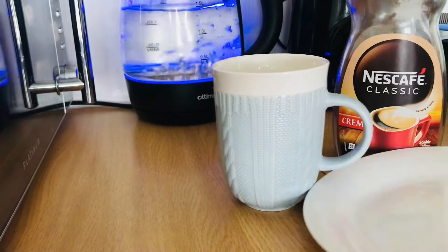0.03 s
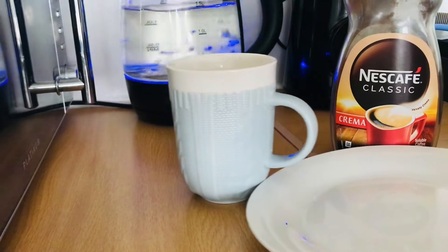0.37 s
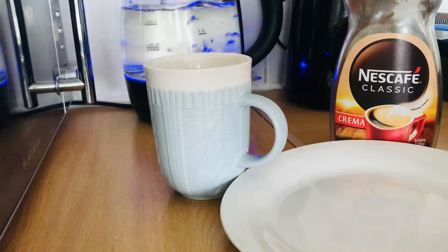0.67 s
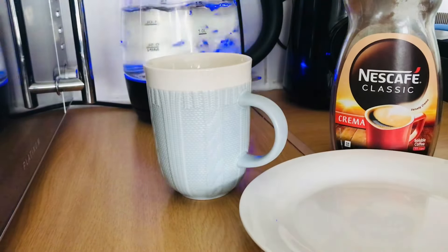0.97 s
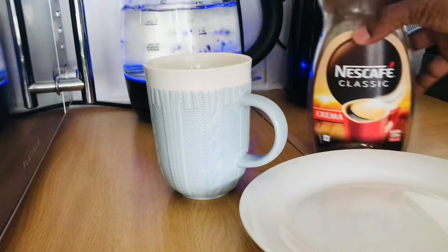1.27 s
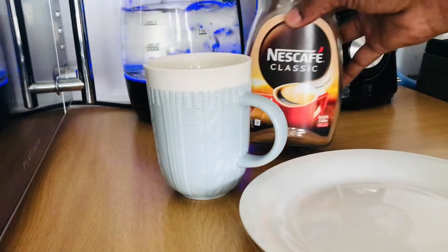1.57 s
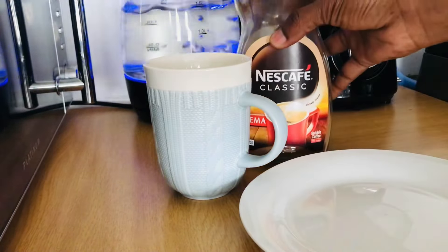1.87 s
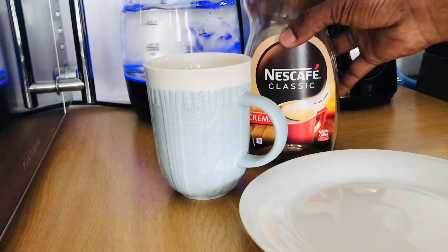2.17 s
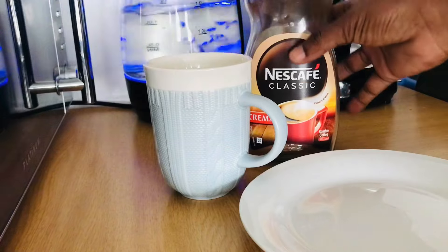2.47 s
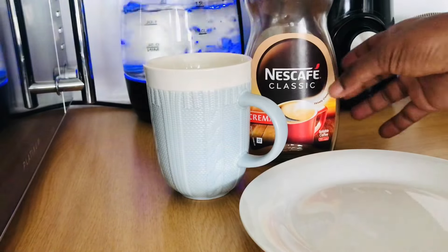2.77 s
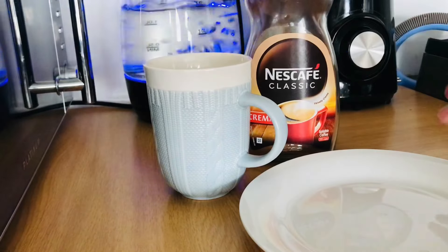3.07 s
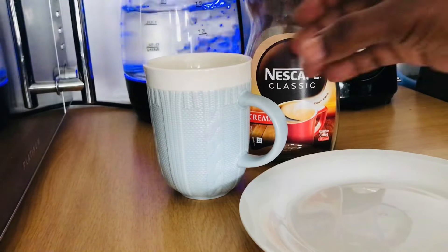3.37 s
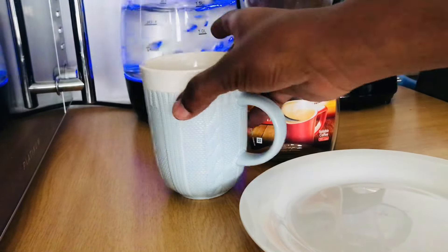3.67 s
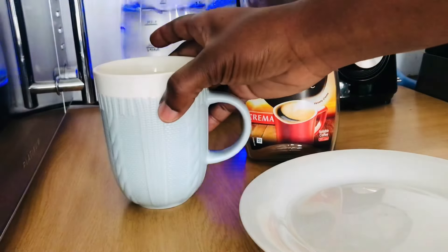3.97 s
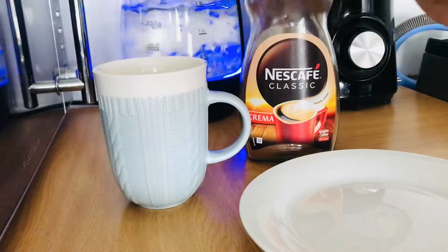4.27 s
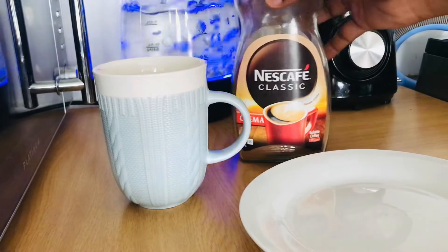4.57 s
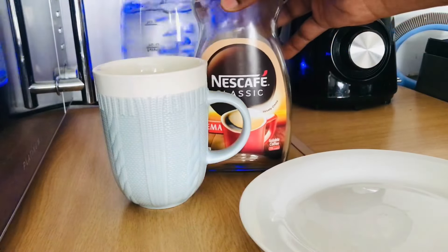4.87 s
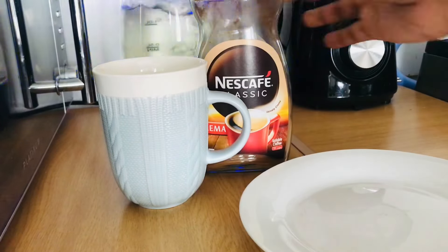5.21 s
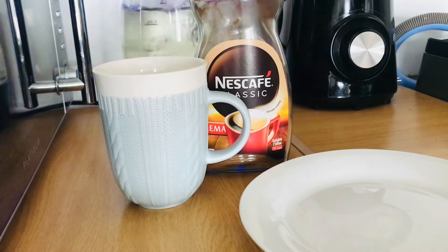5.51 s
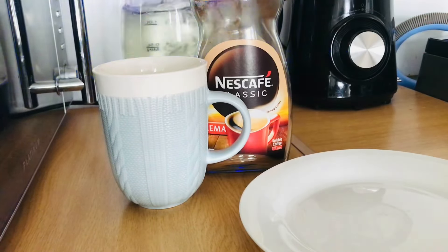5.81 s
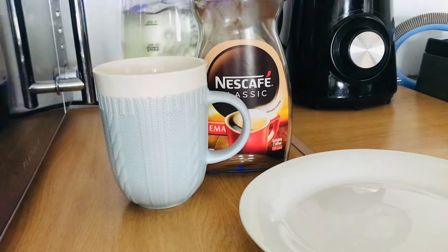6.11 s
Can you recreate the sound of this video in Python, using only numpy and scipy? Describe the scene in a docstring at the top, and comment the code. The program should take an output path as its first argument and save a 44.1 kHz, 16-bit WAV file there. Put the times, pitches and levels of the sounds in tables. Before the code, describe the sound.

In a small kitchen, a close microphone picks up mug knocks and a plate sliding over a wooden worktop. A glass jar is shifted and put down with solid clacks. The knocking pauses, then the mug slides briefly and lands, followed by a cluster of rattling knocks and a faint sleeve rustle. Throughout, an electric kettle rumbles and simmers, its thin whine swelling and fading.

```python
"""An electric kettle rumbles and whines on a wooden kitchen counter as steam bubbles collapse inside it.
At the start a mug clinks and a plate is pushed along and settles. From 1.2 s a glass coffee jar is
put down and shifted. The whine is loudest near 3 s; then the mug squeaks and slides. More knocks
follow from 4.5 s, and cloth rustles near 5.5 s while the kettle carries on.
Each knock thumps the worktop, clacks and rings the china, and the small kitchen echoes it."""
import sys
import numpy as np
from scipy import signal
from scipy.fft import rfft, irfft
from scipy.io import wavfile
from scipy.ndimage import uniform_filter1d

SR = 44100
rng = np.random.default_rng(int(sys.argv[2]) if len(sys.argv) > 2 else 0)


def transcribe(signal):
    """Save signal, clipped to [-1, 1], as a 16-bit WAV file at the path in sys.argv[1]."""
    frames = np.atleast_2d(signal).T
    limited = np.clip(frames, -1, 1)
    pcm = np.round(limited * 32767).astype(np.int16)
    wavfile.write(sys.argv[1], SR, pcm)


N = 275575
TIME, HZ = np.arange(N) / SR, np.fft.rfftfreq(N, 1 / SR)
AFTER = TIME[:SR // 2]  # seconds since a knock
KNOCK_HZ = np.fft.rfftfreq(len(AFTER), 1 / SR)


# Tone of the deep rumble, and of the simmer heard through the kettle's wall: f/Hz, relative level/dB
RUMBLE_TONE = [(20, -50), (33, -32), (48, -13.5), (63, -16), (90, -10), (150, -9.5), (200, -22),
               (260, -51.5), (400, -73)]
SIMMER_TONE = [(100, -19), (210, 8.5), (270, 1), (400, -1.5), (680, -3), (800, -12), (1450, -10.5),
               (2200, -20.5), (5600, -24), (6400, -29), (7700, -33.5), (8500, -28), (10500, -33),
               (14000, -32.5), (16000, -45)]
# Pitches that the water, jug and worktop favour: f/Hz, width/Hz, boost/dB
KETTLE_RESONANCES = [(47.6, 16, 3), (93.2, 7.2, 7.5), (128.3, 16, 12.5), (191.2, 8.4, 6.5), (242, 18, -1.5),
                     (272, 6, 0), (305.6, 12, 10.5), (340.4, 9.2, 10), (932.4, 20, 9.5), (1022, 27, 8.5),
                     (1290, 105, 5), (5350, 37, 17.5)]

def kettle(rumble_db=-37, surge_db=1.08, simmer_db=-46.5, flutter_db=1.0, hiss_share=0.67):
    """Steam bubbles collapse on the hot base and shake the water, the jug and the worktop."""
    body_db = boost(KETTLE_RESONANCES, HZ)
    rumble = coloured(pops(per_s=900, spread_db=2.5), curve(RUMBLE_TONE, HZ) + body_db)
    rumble /= np.sqrt(uniform_filter1d(rumble ** 2, SR // 7))  # steady it, then add slow surges
    rumble *= gain(rumble_db + surge_db * drift(hz=1))
    bubbles = pops(per_s=5000, spread_db=3.0) * gain(flutter_db * drift(hz=16))
    hiss = hiss_share * rng.standard_normal(N)
    simmer = coloured(bubbles + hiss, curve(SIMMER_TONE, HZ) + body_db)
    return rumble + gain(simmer_db) * simmer


# How the whine swells and fades: t/s, level/dB
WHINE_LEVELS = [(0, -66), (1.1, -66.5), (1.8, -69), (2.45, -67.5), (3.1, -61), (3.6, -71), (4.3, -63.5),
                (4.95, -71), (6.25, -65.5)]

def whine(pitch_hz=5400, waver_hz=44, flicker_db=0.5):
    """The kettle's thin whine: one note, made rough by a quick waver."""
    cycles = np.cumsum(pitch_hz + waver_hz * drift(hz=133)) / SR
    level_db = np.interp(TIME, *np.transpose(WHINE_LEVELS)) - flicker_db * drift(hz=40)
    return gain(level_db) * np.sin(2 * np.pi * cycles)


# Notes that each thing rings with when hit: f/Hz, level/dB, time to fade by 60 dB/s
WORKTOP_NOTES = [(95.7, -4, 0.29), (131.3, 3.5, 0.19), (144, -3.5, 0.22), (156, -27, 0.22),
                 (271.4, -6.5, 0.096), (280, -14, 0.12)]
MUG_NOTES = [(1206, -6, .22), (2404, -2, .09), (2821, -2, .095), (3060, -9, .06), (3720, 3, .07),
             (4540, -20, .08), (5250, -12, .09), (5787, -15, .17), (6950, -15, .09), (7280, -16, .08),
             (8440, -4, .06), (8950, -17, .08), (9150, -19, .09), (10850, -25, .1), (11480, -19, .11),
             (12100, -22, .09), (12750, -24, .08), (14200, -23, .08), (14630, -20, .09)]
PLATE_NOTES = [(2190, -14, 0.11), (2420, 1, 0.25), (2540, 5, 0.035), (3730, 3.5, 0.085), (4560, 5.5, 0.092),
               (5480, 1.5, 0.034), (7010, 2, 0.053), (7140, -6, 0.17), (9000, 0.5, 0.12), (11100, -10, .15),
               (14180, 10, .075)]
# Tone of the wooden clack: f/Hz, relative level/dB
CLACK_TONE = [(60, -43), (150, -17), (260, -1), (450, -4), (680, -3.5), (820, -4.5), (1000, -5.5),
              (1500, -8.5), (2600, -4), (3200, -5.5), (8000, -2.5), (16000, -25)]
# How long the clack lasts: f/Hz, time to fade by 60 dB/s
CLACK_FADE = [(200, 0.25), (700, 0.089), (2000, 0.061), (6000, 0.051), (15000, 0.069)]
# Pitches that the wood favours: f/Hz, width/Hz, boost/dB
WOOD_RESONANCES = [(290, 25, 0.5), (311.3, 13.6, 6), (345, 12, 2), (465, 60, -1), (500, 10, -1.5),
                   (575, 43, 5), (645, 26, 7), (764, 25, 3.5), (940.3, 25, 5.5), (1014, 30, 3),
                   (1130, 21, 3), (1243, 45, 7.5), (1410, 47, 7), (1690, 32, 0.5), (1890, 77, 4)]
# Knocks that ring the mug, and those that ring the plate (it settles, then the jar jolts it):
# t/s, clack level/dB, treble cutoff/Hz (higher for a harder hit), thump level/dB, ring level/dB
MUG_KNOCKS = [(.0055, 20, 2800, -52, -18), (.04, 20.5, 720, -19, -61), (.072, 20.5, 650, -35, -34),
              (.146, 13.5, 865, -28, -57), (.478, 1, 1100, -59, -41), (.677, -9, 1090, -57, -51.5),
              (3.799, 2, 600, -48, -62), (3.929, 18.5, 640, -23, -69)]
PLATE_KNOCKS = [(.854, 23, 930, -40, -34), (.864, 21.5, 1450, -35, -30.5), (1.248, 18.5, 740, -33, -46),
                (1.281, 22, 980, -20, -39.5), (1.857, 26.5, 940, -14.5, -34.5), (1.925, 7, 500, -24, -72),
                (2.02, 9.5, 650, -31, -73), (2.199, 6.7, 650, -27.5, -62), (4.521, 11, 720, -19.5, -62),
                (4.556, 8.1, 604, -21.5, -50), (4.5705, 18, 950, -34, -49), (4.583, 15, 900, -35, -56),
                (4.595, 16.5, 880, -35, -57), (4.611, 18, 755, -32, -57), (4.8445, 22, 550, -19, -50.5),
                (4.927, 14.2, 560, -18.5, -69), (4.9645, 16.5, 664, -24.5, -68)]

def knocks(swell_s=0.01, ring_rise_s=0.00071, crack_s=0.0015):
    """Each knock clacks on the wood, sets the heavy worktop swinging and rings the china."""
    out = np.zeros(N)
    thump = -ringing(WORKTOP_NOTES) * (1 - np.exp(-AFTER / swell_s))
    crack = 1 + 0.63 * np.exp(-AFTER / crack_s)  # the first instant is the hardest
    wood_db = curve(CLACK_TONE, KNOCK_HZ) + boost(WOOD_RESONANCES, KNOCK_HZ)
    for hits, notes in (MUG_KNOCKS, MUG_NOTES), (PLATE_KNOCKS, PLATE_NOTES):
        for start, clack_db, cutoff_hz, thump_db, ring_db in hits:
            burst = dying_noise(CLACK_FADE) * crack
            chance_db = 10 * np.log10(uniform_filter1d(abs(rfft(burst)) ** 2, size=70))
            contact_db = -10 * np.log10(1 + (KNOCK_HZ / cutoff_hz) ** 4.58)  # a softer hit is duller
            clack = coloured_hit(burst, wood_db + contact_db - chance_db)  # chance bumps evened out
            ring = ringing(notes, cutoff_hz=6.3 * cutoff_hz) * (1 - np.exp(-AFTER / ring_rise_s))
            add(out, start, gain(clack_db) * clack + gain(thump_db) * thump + gain(ring_db) * ring)
    return out


# Ticks of glass and china: t/s, level/dB, strongest f/Hz
BRIGHT_TICKS = [(.0055, -3, 11100), (0.8636, -14, 8700), (1.281, -31, 6000), (1.858, -20.5, 6400),
                (3.663, -20, 1800), (4.242, -12.5, 9250), (4.474, -17, 3540), (4.573, -15, 3960),
                (4.585, -15, 2500), (4.596, -5, 2500), (5.66, -30, 11100), (5.956, -26, 2780)]

def ticks(fade_s=0.00074, db_per_octave=13):
    """Short, bright ticks: the sharp crack on top of harder knocks, and a few light touches."""
    out = np.zeros(N)
    for start, level_db, centre_hz in BRIGHT_TICKS:
        snap = rng.standard_normal(len(AFTER)) * np.exp(-AFTER / fade_s)
        snap /= np.linalg.norm(snap)
        octaves_away = abs(np.log2((KNOCK_HZ + 1) / centre_hz))
        add(out, start, coloured_hit(snap, level_db - db_per_octave * octaves_away))
    return out


# Tone of a slide's low judder and of its gritty hiss: f/Hz, relative level/dB
JUDDER_TONE = [(120, -2.5), (280, 8), (420, 0), (900, -2.5), (1250, -10.5), (1700, -16), (2100, -20.5),
               (4000, -45), (7000, -57), (16000, -79)]
GRIT_TONE = [(1000, 6), (3000, 9), (7000, 0), (8000, -5), (9300, -0.5), (10500, -12), (12000, 1.5),
             (13200, -12), (14500, -3), (16000, -18)]
# Pitches that scraped china favours: f/Hz, width/Hz, boost/dB
PLATE_RESONANCES = [(1670, 180, 6), (2440, 110, 12.5), (2850, 120, 5), (3740, 64, 13), (4600, 39, 12.5),
                    (6750, 73, 12), (7300, 100, 9), (12000, 300, 2), (14500, 150, 7)]
MUG_RESONANCES = [(287, 30, 12.3), (938, 72, 8.7), (1710, 280, 1.9), (2400, 350, 5.4), (6670, 150, 8.8),
                  (11440, 150, 11), (12120, 150, 10), (14000, 400, 4)]
# Pushes over the wood: t/s, time to speed up/s, length/s, judder level/dB, grit level/dB
PLATE_PUSHES = [(.08, 0.014, .24, -39.5, -53.5), (.32, 0.037, 0.19, -36.5, -51.5),
                (.5, 0.011, 0.1, -44, -59), (.67, 0.0088, 0.32, -47, -59.5)]
MUG_PUSHES = [(3.74, 0.044, 0.075, -32, -47.5), (3.83, 0.033, 0.083, -40, -53.5)]
JAR_PUSHES = [(1.19, 0.069, 0.066, -36.5, -52), (2.32, .03, .05, -53, -58),
              (4.474, 0.0046, 0.057, -53, -58)]

def slides(stop_s=0.013, grip_db=2):
    """A pushed thing moves in tiny slips that shake the wood and hiss on its grain."""
    out = np.zeros(N)
    wood_db = curve(JUDDER_TONE, HZ) + boost(WOOD_RESONANCES, HZ)
    things = (PLATE_PUSHES, PLATE_RESONANCES), (MUG_PUSHES, MUG_RESONANCES), (JAR_PUSHES, [])
    for pushes, resonances in things:
        body_db = boost(resonances, HZ)
        judder = coloured(pops(per_s=2500, spread_db=1.5), wood_db + body_db)
        grit = coloured(pops(per_s=4500, spread_db=1.5), curve(GRIT_TONE, HZ) + body_db)
        grip = gain(grip_db * drift(hz=55))  # the grip varies along the way
        for start, rise_s, length_s, judder_db, grit_db in pushes:
            scrape = gain(judder_db) * judder + gain(grit_db) * grit
            out += stroke(start, rise_s, length_s, stop_s) * grip * scrape
    return out


# Squeaks of sliding china: t/s, level/dB
CHINA_SQUEAKS = [(.475, -48.5), (3.712, -56)]

def squeaks(pitch_hz=6750, rise_s=0.01, fade_s=0.042):
    """The foot of the china catches for a moment and sings one high note."""
    out = np.zeros(N)
    swell = (1 - np.exp(-AFTER / rise_s)) * np.exp(-AFTER / fade_s)
    for start, level_db in CHINA_SQUEAKS:
        add(out, start, gain(level_db) * swell * np.sin(2 * np.pi * pitch_hz * AFTER))
    return out


# Tone of rustling cloth: f/Hz, relative level/dB
CLOTH_TONE = [(1000, -2), (3000, 2), (7000, 2), (10500, 0), (13000, -1), (16000, -13)]

def cloth(level_db=-61):
    """Cloth gives a brief, airy rustle as the arm draws back."""
    rustle = coloured(pops(per_s=6600, spread_db=2.5), curve(CLOTH_TONE, HZ))
    return gain(level_db) * stroke(start=5.425, rise_s=0.029, length_s=0.18, stop_s=0.065) * rustle


# How long the room's echo lasts: f/Hz, time to fade by 60 dB/s
ECHO_FADE = [(150, 0.35), (1000, 0.39), (4000, 0.22), (15000, 0.17)]

def kitchen(sound, echo_db=-12, delay_s=0.0083):
    """A sound arrives directly, then again off the hard walls of a small room."""
    out = sound.copy()
    echo = signal.fftconvolve(sound, dying_noise(ECHO_FADE))[:N]
    add(out, delay_s, gain(echo_db) * echo)
    return out


def gain(db):
    """Turns decibels into a number to multiply by."""
    return 10 ** (np.asarray(db) / 20)


def unit_level(x):
    """Scales a sound to an average strength (rms) of 1."""
    return x / np.sqrt(np.mean(x ** 2) + 1e-20)


def curve(points, hz):
    """Joins (frequency, value) points with lines that are straight on a pitch scale."""
    point_hz, values = np.transpose(points)
    return np.interp(np.log(hz + 1), np.log(point_hz + 1), values)


def boost(resonances, hz):
    """A bump or dip in dB around each listed pitch."""
    return sum(db * np.exp2(-(2 * (hz - centre) / width) ** 2) for centre, width, db in resonances)


def add(mix, start, sound):
    """Mixes a sound in, start seconds from the beginning."""
    part = mix[max(round(start * SR), 0):][:len(sound)]
    part += sound[:len(part)]


def coloured(x, tone_db):
    """Gives a full-length sound a tone, at strength 1."""
    return unit_level(irfft(rfft(x) * gain(tone_db), N))


def coloured_hit(x, tone_db):
    """Gives a short sound a tone without smearing it to before its start."""
    log_gain = np.log(gain(np.maximum(np.r_[tone_db, tone_db[-2:0:-1]], -100)))
    response = np.exp(np.conj(signal.hilbert(log_gain)))[:len(tone_db)]
    return irfft(rfft(x) * response, len(x))


def drift(hz):
    """A random wobble of strength 1, up to about hz times a second."""
    return coloured(rng.standard_normal(N), -10 * np.log10(1 + (HZ / hz) ** 4))


def pops(per_s, spread_db):
    """Random clicks, mostly small, a few large."""
    size = gain(spread_db * np.minimum(rng.exponential(1, N), 4))
    return unit_level(size * rng.choice([-1, 1], N) * (rng.random(N) < per_s / SR))


def dying_noise(fade_times):
    """A burst of noise whose pitch bands have equal energy but fade at their own speeds."""
    hz, t, bands = signal.stft(rng.choice([-1., 1.], len(AFTER)), SR, nperseg=128)
    fade = gain(-60 * t / curve(fade_times, hz)[:, None])
    fade /= np.linalg.norm(fade, axis=1, keepdims=True)
    burst = signal.istft(bands * fade, SR)[1][:len(AFTER)]
    return burst / np.linalg.norm(burst)


def ringing(notes, cutoff_hz=np.inf):
    """Pure notes that die away; a soft hit barely wakes the high ones."""
    out = np.zeros(len(AFTER))
    for hz, level_db, fade_s in notes:
        strength = gain(level_db - 60 * AFTER / fade_s) * np.exp(-(hz / cutoff_hz) ** 2)
        out += strength * np.sin(2 * np.pi * hz * AFTER)
    return out


def stroke(start, rise_s, length_s, stop_s):
    """Loudness of one hand movement: it grows with speed, holds, then dies away."""
    speed = np.clip((TIME - start) / rise_s, 0, 1)
    return speed ** 0.8 * np.exp(-np.maximum(TIME - start - length_s, 0) / stop_s)


def scene():
    """The kettle, with the mug, plate and jar moved about in front of it, in one channel."""
    handling = knocks() + ticks() + slides() + squeaks()
    return (kettle() + whine() + kitchen(handling + cloth()))[None]


def record(dry, low_cut_hz=36, high_cut_hz=15850):
    """The microphone drops the deepest bass and the highest treble."""
    bass_cut = signal.butter(N=4, Wn=low_cut_hz, btype="high", fs=SR, output="sos")
    treble_cut = signal.firwin(511, high_cut_hz, window=("kaiser", 9), fs=SR)
    return signal.oaconvolve(signal.sosfilt(bass_cut, dry), treble_cut[None], "same")


dry = scene()
out = record(dry)
transcribe(out)
```